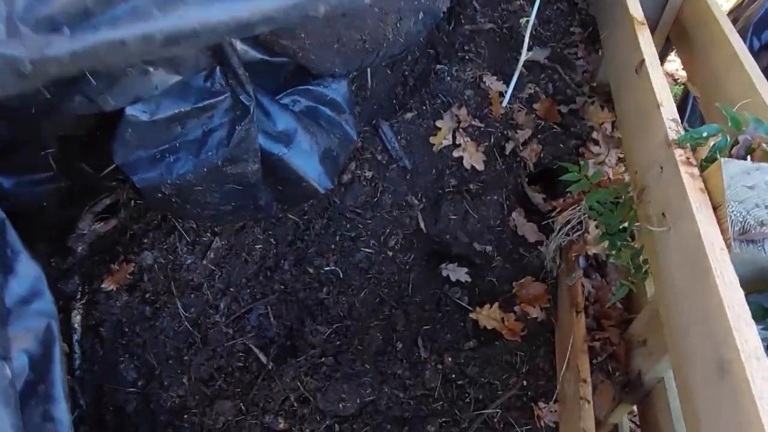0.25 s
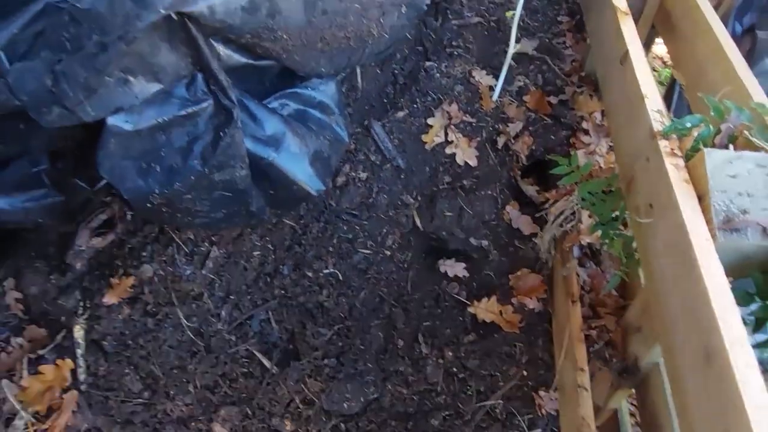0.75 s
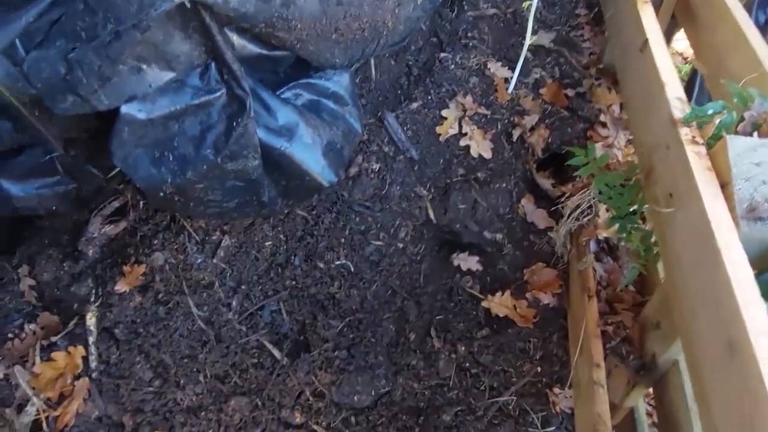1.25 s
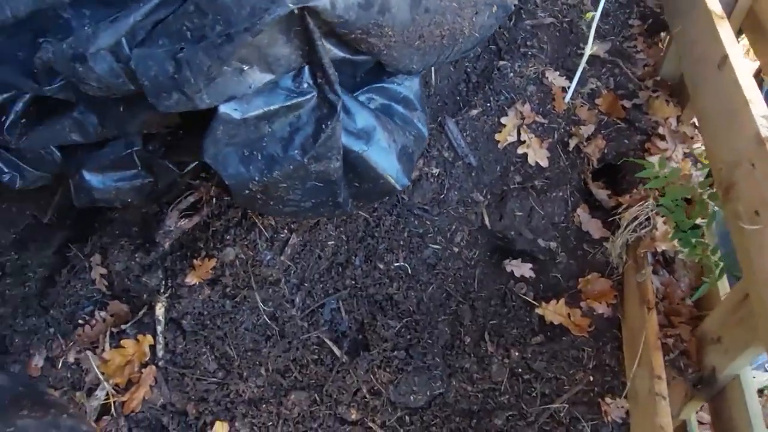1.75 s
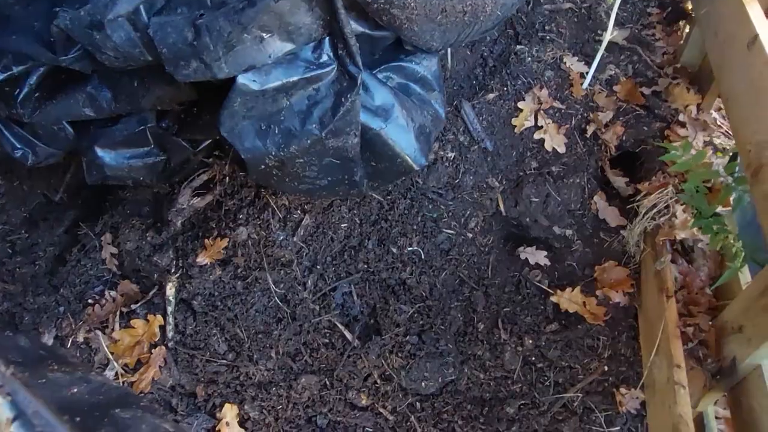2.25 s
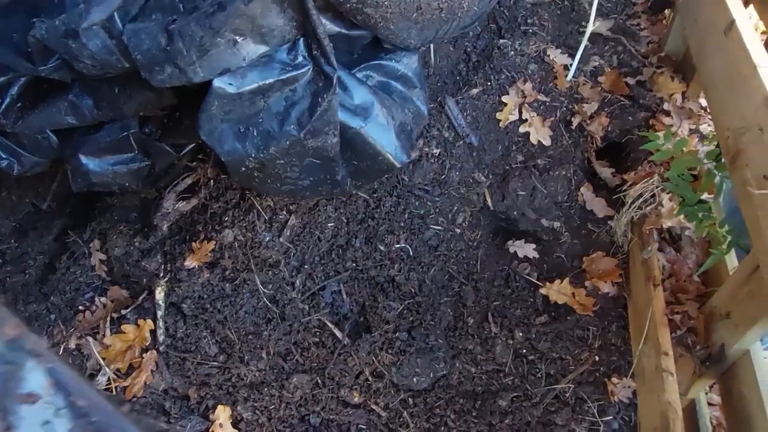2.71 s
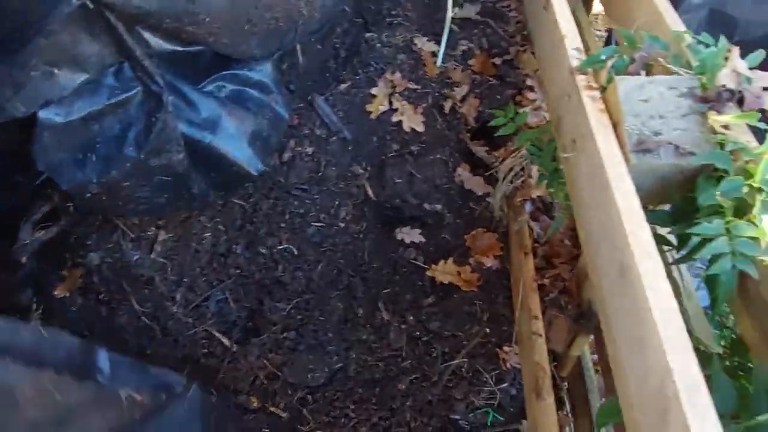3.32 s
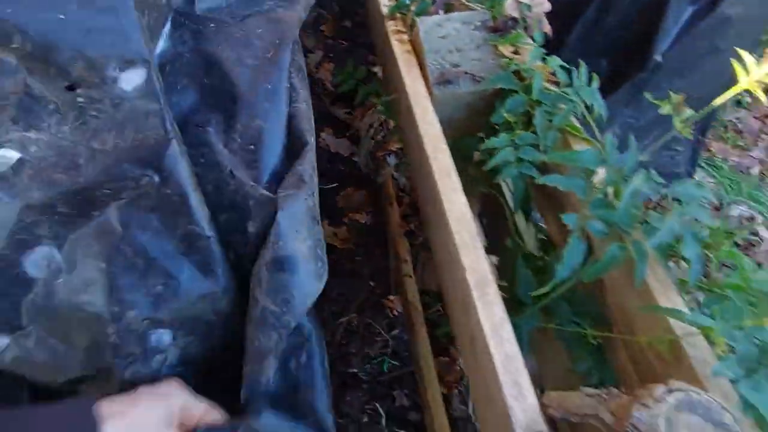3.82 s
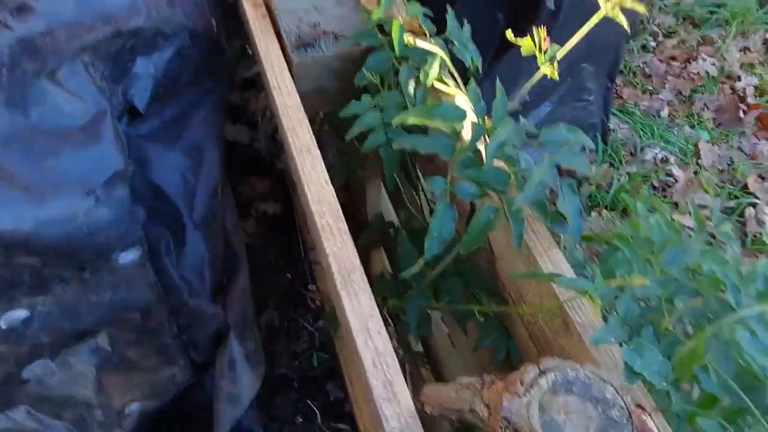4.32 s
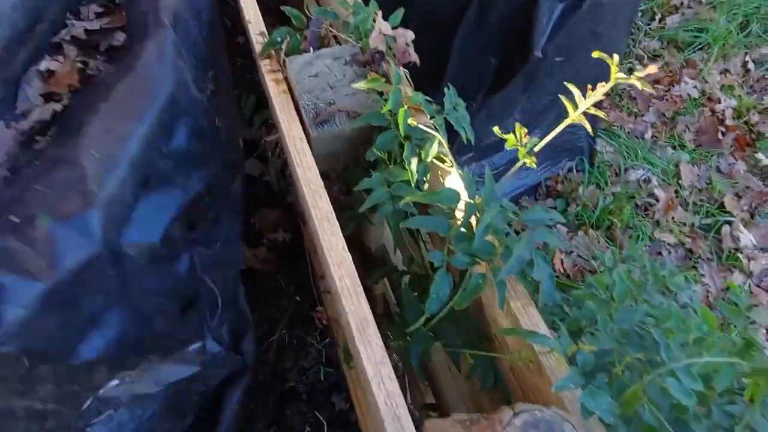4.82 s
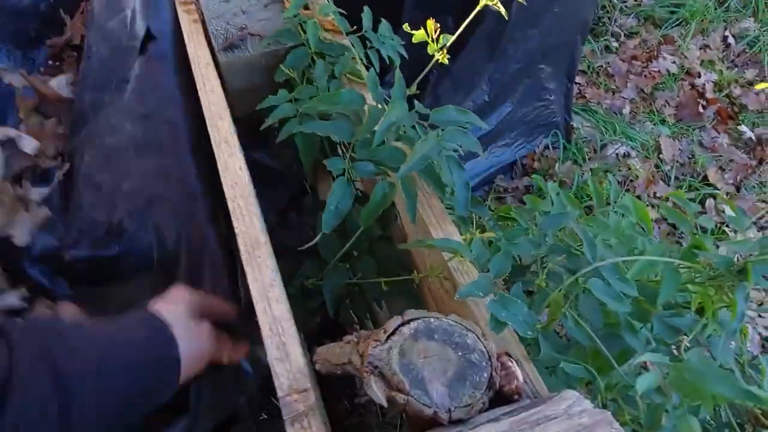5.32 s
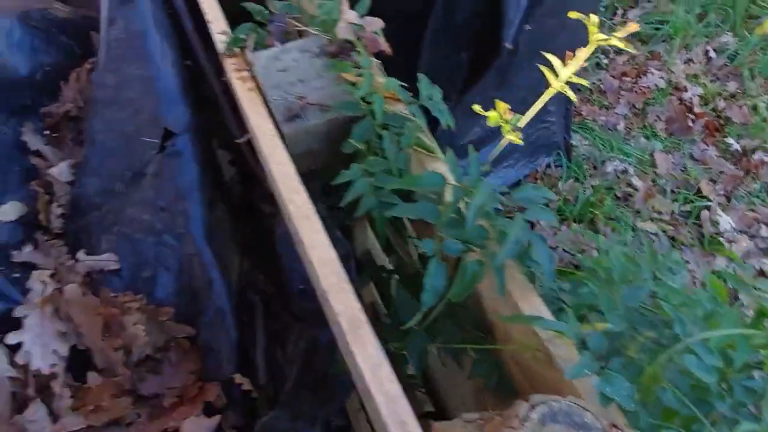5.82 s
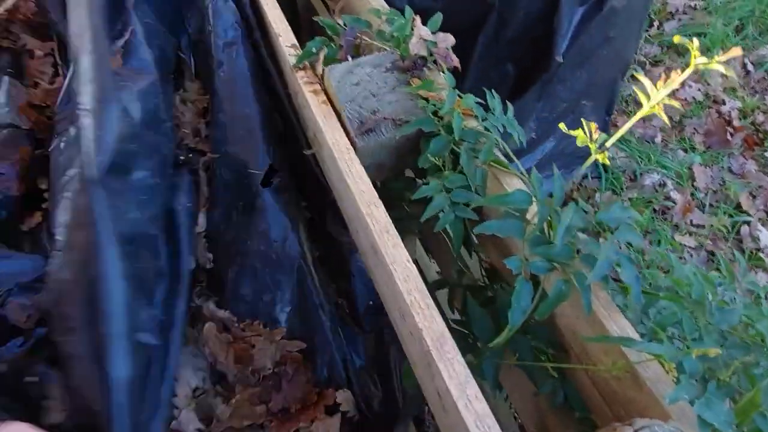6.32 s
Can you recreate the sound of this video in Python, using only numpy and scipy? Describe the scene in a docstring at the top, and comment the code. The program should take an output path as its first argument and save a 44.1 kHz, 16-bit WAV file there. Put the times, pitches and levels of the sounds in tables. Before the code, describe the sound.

Outdoors, plastic sheeting is worked over a bin, close and a little left in stereo. A faint low flutter and slide opens over quiet rumble; from about 0.55 s the sheet bursts into crinkling, with soft hollow booms and sharp snaps, strongest at 0.8 to 1.25 s. It thins to small crackles by 1.9 s. From 2.1 to 3 s it is nearly quiet: a distant bird repeats a quick, high whistled slur, fading, beside a barely audible far whine. At 3.2 s the second pull builds, with flaps, hissing film and hard snaps, densest at 3.9 to 4.5 s, easing by 4.7 s. After small ticks, the third pull swells from 5.1 s, with its biggest booms and a thin dry leaf crackle around 5.45 s. It subsides after 6 s, then a short fresh rustle and snap come at about 6.5 s.

```python
"""Plastic sheet pulled over a compost bin outdoors, in three stretches, close to the left of the microphone.
Slack folds flap and boom, creases buckle in showers of crinkles and sharp snaps, and the film hisses as it slides.
Dry leaves skid on it in the last pull. In the pause a small bird calls faintly over a low outdoor rumble.
Sheet and leaves are noise bursts shaped by spectra and resonances, with hiss under them; the bird and a far
whine are sines; the rumble is shaped noise."""
import sys
import numpy as np
from scipy import signal
from scipy.fft import rfft, irfft, next_fast_len
from scipy.io import wavfile
from scipy.ndimage import uniform_filter1d

SR = 44100
rng = np.random.default_rng(int(sys.argv[2]) if len(sys.argv) > 2 else 0)


def digitize_waveform(pressure):
    """Quantize a signal to 16-bit integers and store it at the path in sys.argv[1].

    Rows of a 2-D input are taken as channels; values are limited to [-1, 1].
    """
    field = np.atleast_2d(pressure).T
    bounded = np.clip(field, -1, 1)
    quanta = np.round(bounded * 32767).astype(np.int16)
    wavfile.write(sys.argv[1], SR, quanta)


N = 288855
GRAIN = 2048  # samples per burst
PORT_LAG_S = 0.0004045  # right channel behind left, for steady noise

# Spectrum of large folds pushing air. Each row: frequency in Hz, relative level in dB.
FLAP_SPECTRUM = [(35, -19.5), (70, -6), (140, -4), (260, 0), (370, -3), (550, -7.5), (900, -17.5),
                 (2000, -26.5)]
# Spectrum of buckling creases. Each row: frequency in Hz, relative level in dB.
CRINKLE_SPECTRUM = [(250, -27.5), (600, -2.5), (1050, 2.5), (1500, -0.5), (2200, -5.5), (3300, -16.5),
                    (5000, -18), (9000, -37.5), (16000, -32)]
# Spectrum of grit and snap ticks. Each row: frequency in Hz, relative level in dB.
TICK_SPECTRUM = [(1500, 4.5), (3200, -1), (4800, -4), (7300, -6), (9800, -9.5), (12500, -5.5),
                 (16000, -36.5)]
# Large folds that tumble over during the moves.
# Each row: time in seconds, relative flapping and crinkling levels in dB, pitch of the trapped air in Hz.
FOLDS = [(0.814, -42, -37, 327), (0.985, -26, -33, 280), (1.097, -25, -31, 304), (1.178, -21, -29, 271),
         (1.418, -36, -62, 131.1), (3.28, -37, -49, 207), (3.354, -30, -34, 268), (3.443, -29, -42.5, 129),
         (3.57, -30, -54, 252), (3.656, -25, -42.5, 320), (4.106, -28, -54, 267), (4.161, -26.5, -36, 320),
         (4.322, -31.5, -36.5, 340), (4.541, -32, -39.5, 216), (4.8, -35.5, -61, 328),
         (4.888, -43.5, -76, 253.5), (5.111, -37, -63, 155), (5.191, -32.5, -35.5, 258),
         (5.349, -26.5, -35, 279), (5.45, -20, -26, 218), (5.586, -17.5, -29, 236), (5.777, -27, -34, 300),
         (5.808, -28.5, -31, 208), (5.871, -28.5, -33, 352), (5.962, -37, -45, 267.6),
         (6.131, -45, -49, 350)]


def undb(db):
    """Decibels to gain."""
    return 10 ** (np.asarray(db) / 20)


def sides(pan_db):
    """Left and right gains for a level difference; positive is left."""
    return undb(np.array([pan_db, -pan_db]) / 2)[..., None]


def moments(count):
    """Random times in seconds, evenly likely."""
    return rng.uniform(0, N / SR, count)


def slip(rate_hz):
    """Random levels, one per 1 / rate_hz, joined by smoothing; spread near 1.9."""
    hold = int(SR / rate_hz)
    steps = np.repeat(rng.standard_normal(N // hold + 1), hold)
    return 2.3 * uniform_filter1d(steps, hold)[:N]


def shape(points, size):
    """Gain per frequency bin from (Hz, dB) points, falling away beyond both ends."""
    hz, db = np.transpose(points)
    log_hz = np.log(np.fft.rfftfreq(size, 1 / SR) + 1)
    below = np.maximum(np.log(hz[0]) - log_hz, 0)
    above = np.maximum(log_hz - np.log(hz[-1]), 0)
    return undb(np.interp(log_hz, np.log(hz), db) - 20 * (below + above))


def causal(gain):
    """Minimum-phase response with these gains: it rings only after the blow."""
    cepstrum = irfft(np.log(gain + 1e-9))
    half = cepstrum.shape[-1] // 2
    fold_forward = np.r_[1, np.full(half - 1, 2), 1, np.zeros(half - 1)]
    return np.exp(rfft(cepstrum * fold_forward))


def facet(hz, q):
    """One damped band-pass resonance per pitch, as of a facet of the film."""
    s = 1j * np.fft.rfftfreq(GRAIN, 1 / SR) / hz[:, None]
    return s / q / (s * s + s / q + 1)


def ports(pair, lag_s):
    """Two unrelated spectra become left and right: the right is late, and less alike in the treble."""
    alike_hz = 2170
    f = np.linspace(0, SR / 2, pair.shape[-1])
    alike = .3 + .7 / (1 + (f / alike_hz) ** 2)
    right = alike * pair[0] + np.sqrt(1 - alike ** 2) * pair[1]
    return np.array([pair[0], right * np.exp(-2j * np.pi * f * lag_s)])


def noise(points, lag_s):
    """Stereo noise of rms 1 with a spectrum of (Hz, dB) points."""
    size = 2 * next_fast_len(N // 2 + 1)
    spectra = rfft(rng.standard_normal((2, size))) * shape(points, size)
    x = irfft(ports(spectra, lag_s))[:, :N]
    return x / np.sqrt(np.mean(x ** 2))


def bursts(times, response, decay_s, crack_db, tail_db, tail_s):
    """Buckles of unit energy: a crack, a brief shudder of the film, then scatter from the folds and bin walls."""
    # Where the sheet is worked. Each row: time in seconds, delay of the right channel in seconds.
    bearing = [(.6, 0.00036), (1.1, 0.00044), (3.6, 0.00051), (4.1, 0.00036), (5.4, 0.0004), (5.7, 0.00027)]
    lag_spread_s, crack_decay_s = .00004, .0003
    t = np.arange(GRAIN) / SR
    crack = undb(crack_db) * np.exp(-t / crack_decay_s)
    scatter = undb(tail_db) * np.exp(-t / tail_s)
    fade_out = np.minimum(2 * (1 - t / t[-1]), 1)
    envelope = (crack + np.exp(-t / decay_s) + scatter) * fade_out
    shudder = rng.standard_normal((2, len(times), GRAIN)) * envelope
    lag_s = np.interp(times, *np.transpose(bearing))[:, None]
    lag_s = lag_s + lag_spread_s * rng.standard_normal((len(times), 1))
    sound = irfft(ports(rfft(shudder) * response, lag_s))
    return sound / np.sqrt(np.sum(sound ** 2, axis=(0, 2), keepdims=True) / 2)


def place(times, sounds):
    """Lay short stereo sounds on the time line."""
    out = np.zeros((2, N + GRAIN))
    for k, start in enumerate(np.clip(times * SR, 0, N).astype(int)):
        out[:, start:start + GRAIN] += sounds[:, k]
    return out[:, :N]


def shower(times, sounds, spread_db):
    """Buckles with exponentially scattered dB levels, at a steady mean power of 1."""
    sizes = undb(spread_db * np.minimum(rng.exponential(size=(len(times), 1)), 4))
    x = place(times, sounds * sizes)
    power = uniform_filter1d(np.mean(x ** 2, axis=0), size=3000)
    return x / np.sqrt(power + 1e-9)


def outdoors():
    """Low rumble of the open air, nearly the same on both sides in the bass, and a very faint far whine that fades."""
    # Rumble spectrum. Each row: frequency in Hz, relative level in dB.
    air_spectrum = [(15, -43), (30, -24.5), (52, 2.5), (76, -9), (117, -8), (185, -24), (270, -20),
                    (607, -30), (3080, -48), (3520, -48), (6560, -45.5), (7110, -47), (16000, -54)]
    # Far whine. Each row: time in seconds, level in dB.
    whine_levels = [(0.3, -77.5), (2.4, -82), (2.6, -88.5)]
    t = np.arange(N) / SR
    air = noise(air_spectrum, 0)
    whine = np.sin(2 * np.pi * 1389 * t)
    return undb(-57.0) * air + undb(np.interp(t, *np.transpose(whine_levels))) * whine


def bird():
    """A far bird repeats a rising two-voiced slur and an arched whistle, smeared by the garden."""
    # Each row: start in seconds, slur pitch in Hz, whistle pitch in Hz, relative level in dB.
    notes = [(2.159, 4150, 6900, -66), (2.32, 4230, 6680, -67.5), (2.484, 4280, 6480, -66),
             (2.635, 4340, 6150, -71), (2.769, 4325, 6480, -78.5), (2.906, 4270, 6550, -81)]
    lower_voice = .73  # pitch ratio
    t = np.arange(N) / SR
    song = np.zeros(N)
    waver = 1 + .007 * slip(rate_hz=250)
    for s, slur_hz, whistle_hz, db in notes:
        early = np.clip((t - s - .02) / 0.016, -4, 4)
        late = np.clip((t - s - .04) / 0.014, -4, 4)
        slur = 2 * np.pi * np.cumsum(waver * slur_hz * (1 + 0.047 * early)) / SR
        whistle = 2 * np.pi * np.cumsum(waver * whistle_hz * (1 - 0.023 * late ** 2)) / SR
        slur_voices = np.sin(slur) + 0.68 * np.sin(lower_voice * slur)
        whistle_voices = np.sin(whistle) + 0.47 * np.sin(lower_voice * whistle)
        song += undb(db - 8.5) * np.exp(-early ** 2) * slur_voices
        song += undb(db) * np.exp(-late ** 2) * whistle_voices
    echoes = rng.standard_normal((2, N)) * np.exp(-t / 0.041)
    echoes /= np.sqrt(np.sum(echoes ** 2, axis=1, keepdims=True))
    smeared = signal.fftconvolve(song[None], echoes, axes=1)[:, :N]
    return undb(-2) * song + undb(4) * smeared


def leaves(count):
    """Dry leaves skid over the film in a dense, thin crackle."""
    # Each row: time in seconds, relative level in dB.
    skid_levels = [(5.098, -66), (5.3, -76), (5.45, -33.5), (5.6, -43), (5.7, -64), (5.85, -54), (6.0, -59),
                   (6.3, -86)]
    # Each row: frequency in Hz, relative level in dB.
    leaf_spectrum = [(2500, -14), (4500, 3), (7000, -9), (9500, -17), (15000, -16)]
    s, db = np.transpose(skid_levels)
    times = moments(count)
    colour = causal(shape(leaf_spectrum, GRAIN))
    scrapes = bursts(times, colour, decay_s=0.0025, crack_db=-13, tail_db=-19, tail_s=.006)
    crackle = shower(times, scrapes, spread_db=1.5)
    gain = np.interp(np.arange(N) / SR, s, undb(db), left=0, right=0)
    return crackle * gain * sides(5.0)


def swell(start_s, hold_s, attack_s, release_s):
    """Gain that rises to 1, holds and dies away, 20 dB per attack or release time."""
    t = np.arange(N) / SR - start_s
    return undb(20 * (np.minimum(t, 0) / attack_s - np.maximum(t - hold_s, 0) / release_s))


def handling():
    """Gains of flapping, crinkling and sliding: the powers of all moves and tumbling folds add up."""
    # Moves of the sheet. Each row: start of hold, hold, attack and release in seconds (the last two per 20 dB),
    # relative flapping, crinkling and sliding levels in dB.
    moves = [(0.027, 0.06, 0.25, 0.072, -48.5, -76, -50.5), (0.124, 0.068, 0.054, 0.15, -58, -72.5, -70.5),
             (0.502, 0.047, 0.053, .05, -75, -88, -71), (0.647, 0.25, 0.1, .1, -38.5, -50, -54.5),
             (0.797, 0.49, 0.018, 0.19, -33, -43.5, -52.5), (1.55, .08, 0.073, .1, -72, -62, -65),
             (1.694, 0.074, 0.174, 0.058, -49, -52.5, -61), (1.958, 0.16, 0.32, 0.15, -55, -61, -67),
             (3.234, 0.095, 0.098, .05, -52, -57.5, -65), (3.363, 0.029, 0.079, 0.026, -33.5, -49, -50.5),
             (3.426, 0.16, 0.037, 0.071, -41.5, -52, -53), (3.55, 0.37, 0.16, 0.11, -33, -42, -52),
             (3.914, 0.068, 0.087, 0.076, -26.5, -33.5, -44), (4.14, 0.325, 0.18, 0.074, -32.5, -47.5, -53),
             (4.468, 0.095, 0.066, 0.23, -31.5, -46, -45.5), (4.759, 0.021, 0.01, 0.02, -53, -52, -54),
             (4.893, 0.12, 0.09, 0.16, -56, -65, -77), (5.11, 0.061, 0.039, .05, -32, -50, -59),
             (5.192, .42, 0.072, .12, -26, -38, -44.5), (5.754, 0.21, 0.45, 0.24, -33, -48, -44),
             (6.125, 0.013, 0.092, 0.14, -40, -51.5, -77.5), (6.285, 0.046, 0.074, 0.22, -51, -72, -79),
             (6.444, 0.044, 0.0066, 0.095, -36, -57, -58.5), (6.506, 0.052, 0.021, .1, -28, -36.5, -52)]
    fold_attack_s, fold_release_s = 0.041, 0.044  # per 20 dB
    power = np.zeros((3, N))
    for start_s, hold_s, attack_s, release_s, *db in moves:
        power += (undb(db)[:, None] * swell(start_s, hold_s, attack_s, release_s)) ** 2
    for s, *db, _ in FOLDS:
        power[:2] += (undb(db)[:, None] * swell(s, 0, fold_attack_s, fold_release_s)) ** 2
    return np.sqrt(power)


def sliding(count):
    """Film rubs on film in small jerks: a hiss with tiny ticks of grit in it."""
    # Each row: frequency in Hz, relative level in dB.
    slide_spectrum = [(300, -6), (1000, 10), (2200, -2.5), (3500, 1), (4800, -2), (7000, -2), (9500, -8),
                      (12300, -2), (16000, -10)]
    times = moments(count)
    colour = causal(shape(TICK_SPECTRUM, GRAIN))
    grit = bursts(times, colour, decay_s=.001, crack_db=-6.5, tail_db=-18, tail_s=.006)
    hiss = noise(slide_spectrum, PORT_LAG_S)
    rubbing = hiss + undb(-8.5) * shower(times, grit, spread_db=-1.5)
    jerks = undb(1.7 * slip(rate_hz=28))
    return rubbing * jerks * sides(3.4)


def crinkling(count):
    """Small creases give way, each ringing a facet of its own size, over the dull swish of the dragged sheet."""
    times = moments(count)
    hz = 1700 * 2 ** np.clip(0.71 * rng.standard_normal(count), -2, 2)
    colour = causal(shape(CRINKLE_SPECTRUM, GRAIN)) * (0.29 + facet(hz, q=8.2))
    creases = bursts(times, colour, decay_s=.0015, crack_db=-6, tail_db=-16, tail_s=.008)
    swish = undb(-5.5) * noise(CRINKLE_SPECTRUM, PORT_LAG_S)
    return (shower(times, creases, spread_db=4.5) + swish) * sides(.6)


def thud_colour():
    """Air pushed by a large fold, with the hollow of the bin ringing along."""
    bin_hz, bin_q, bin_share = 331, 6.5, 0.13
    return causal(shape(FLAP_SPECTRUM, GRAIN)) * (1 + bin_share * facet(np.array([bin_hz]), bin_q))


def flapping(count):
    """Large slack folds flip over and push air: soft, low thuds."""
    times = moments(count)
    thuds = bursts(times, thud_colour(), decay_s=0.0028, crack_db=-10, tail_db=-10, tail_s=0.018)
    return shower(times, thuds, spread_db=1.0)


def booming():
    """Each tumbling fold traps a pocket of air, which gives a soft boom at its own pitch."""
    boom_db, lead_s = 28, .008  # level re the fold's flapping; lead on the fold's peak
    s, db, _, hz = np.transpose(FOLDS)
    colour = causal(shape(FLAP_SPECTRUM, GRAIN)) * facet(hz, q=4.2)
    booms = bursts(s, colour, decay_s=0.0061, crack_db=-17, tail_db=-14, tail_s=.018)
    return place(s - lead_s, undb(db + boom_db)[:, None] * booms)


def small_snaps(crinkle, count):
    """Rows for lesser snaps at random moments, stronger where the sheet crinkles more."""
    follow = 0.84  # dB of snap per dB of crinkling: they stand out more as the sheet settles
    s = moments(count)
    size, pitch, tick, tick_pitch = np.clip(rng.standard_normal((count, 4)), -2, 2).T
    crinkle_db = 20 * np.log10(crinkle[(s * SR).astype(int)] + 1e-9)
    db = follow * crinkle_db + 8.5 + size
    facet_hz = 1900 * 2 ** (.4 * pitch)
    tick_hz = 4800 * 2 ** (.3 * tick_pitch)
    return np.transpose([s, db, facet_hz, -9.5 + 4 * tick, tick_hz])


def snapping(rows):
    """A taut crease snaps through: a thump of the sheet around it, then a bright tick and a ringing facet."""
    thump_db, ring_db, tick_trim_db = 6, 14.0, 26
    give_s = .001  # the crease gives for an instant before it cracks
    s, db, hz, tick_db, tick_hz = np.transpose(rows)
    ring_colour = causal(shape(CRINKLE_SPECTRUM, GRAIN)) * (.22 + facet(hz, q=8))
    tick_colour = causal(shape(TICK_SPECTRUM, GRAIN)) * (.5 + facet(tick_hz, q=4))
    ring = bursts(s, ring_colour, decay_s=.003, crack_db=3, tail_db=-20, tail_s=.014)
    tick = bursts(s, tick_colour, decay_s=.0011, crack_db=0, tail_db=-17, tail_s=.009)
    thump = bursts(s, thud_colour(), decay_s=0.0058, crack_db=-19.0, tail_db=-18.5, tail_s=0.0091)
    crack = undb(ring_db) * ring * sides(1.3)[:, None]
    crack = crack + undb(tick_db + tick_trim_db)[:, None] * tick * sides(4.5)[:, None]
    size = undb(db)[:, None]
    return place(s, size * undb(thump_db) * thump) + place(s + give_s, size * crack)


def scene():
    """The handling plays the three textures of the sheet; snaps stand out of them."""
    # Creases that snap through. Each row: time in seconds, relative level in dB, facet pitch in Hz,
    # tick level in dB relative to the snap and before the tick trim, tick pitch in Hz.
    large_snaps = [(0.574, -13, 2860, -14.5, 6200), (0.591, -23, 2430, -33, 4200),
                   (0.655, -26, 1940, -10, 11800), (0.704, -15.5, 2020, -18.5, 6700),
                   (0.746, -24.5, 2450, -33, 5000), (0.8, -5, 1850, -13, 6500),
                   (0.979, -12, 900, -18.5, 4440), (1.018, -24.5, 1690, 3, 13600),
                   (1.08, -10, 1830, -21.5, 6340), (1.181, -15, 1600, -39, 4500),
                   (1.199, -4.5, 2050, -19.5, 4500), (1.329, -15.5, 1770, -42, 4700),
                   (1.407, -22, 2270, -42, 4650), (1.685, -30.5, 1190, -19.5, 4300),
                   (1.715, -27, 3180, -16, 4100), (1.753, -27, 2980, -13.5, 4170),
                   (1.766, -30, 1680, -16, 4300), (1.781, -20.5, 1920, -27, 4300),
                   (1.84, -33, 2030, -20, 4800), (1.899, -41, 2210, -22, 4800),
                   (1.924, -31, 1740, -37, 6700), (2.465, -65, 1100, -2.5, 12000),
                   (2.703, -62, 834, -5, 5530), (3.283, -24, 2180, -26, 4700),
                   (3.355, -17, 2380, -28, 6600), (3.42, -23, 1840, -23, 4600),
                   (3.526, -14.5, 1960, -22.5, 11700), (3.626, -10, 1810, -50, 4500),
                   (3.719, -31.5, 2210, -2.5, 4200), (3.843, -14.5, 2100, -26.5, 5200),
                   (3.91, -7.5, 2700, -13.5, 13000), (4.052, -11, 960, -35, 4100),
                   (4.104, -7, 2460, -19, 4450), (4.107, -4, 1140, -19, 4350), (4.15, -9, 1640, -38, 4800),
                   (4.188, -9, 880, -9.5, 4260), (4.277, -11, 820, -20.5, 4020),
                   (4.386, -16.5, 876, -16, 4450), (4.455, -16.5, 1390, -16.5, 4500),
                   (4.583, -17.5, 894, -18, 4860), (4.796, -25.5, 1120, -32, 4900),
                   (4.844, -41, 1360, -19, 5720), (4.885, -43, 826, -11.5, 5200),
                   (5.03, -41, 2150, -17, 4350), (5.106, -16.5, 1800, -23.5, 6100),
                   (5.168, -14, 2100, -22, 4800), (5.23, -14, 1950, -23, 4700),
                   (5.311, -13.5, 2020, -17, 11500), (5.393, -13.5, 990, -9, 4470),
                   (5.508, -13, 930, -14.5, 4600), (5.519, -10.5, 866, -14.5, 4600),
                   (5.542, -9.5, 1030, -18, 4370), (5.572, -12.5, 2480, -29, 7500),
                   (5.609, -20, 2260, 1, 5660), (5.648, -21, 2440, -7.5, 4770),
                   (5.879, -15, 2475, -15, 6350), (6.443, -25.5, 2160, -38, 6400),
                   (6.503, -15.5, 1730, -22.5, 4254), (6.524, -12, 1890, -37, 5300)]
    flap, crinkle, slide = handling()
    sheet = undb(-0.5) * flap * flapping(count=1100)
    sheet += undb(5) * crinkle * crinkling(count=1600)
    sheet += undb(9) * slide * sliding(count=700)
    snaps = snapping(large_snaps) + snapping(small_snaps(crinkle, count=50))
    return outdoors() + bird() + leaves(count=1000) + sheet + booming() + snaps


def record(dry):
    """The recorder rounds the loudest peaks and cuts the top."""
    top_hz = 16000
    low_pass = signal.ellip(10, .2, 70, top_hz, fs=SR, output="sos")
    return signal.sosfilt(low_pass, np.tanh(dry))


dry = scene()
out = record(dry)
digitize_waveform(out)
```